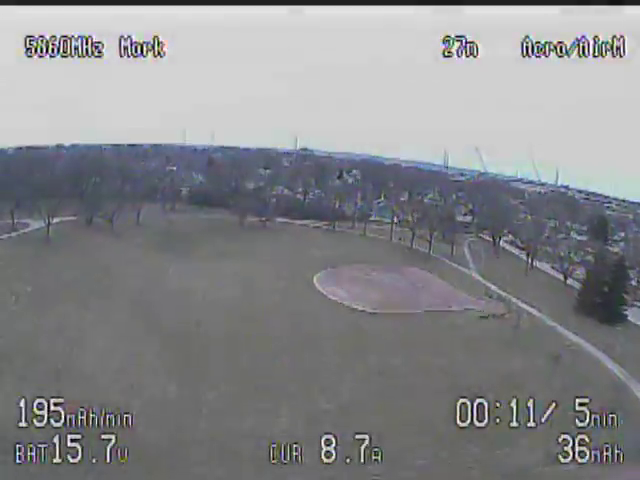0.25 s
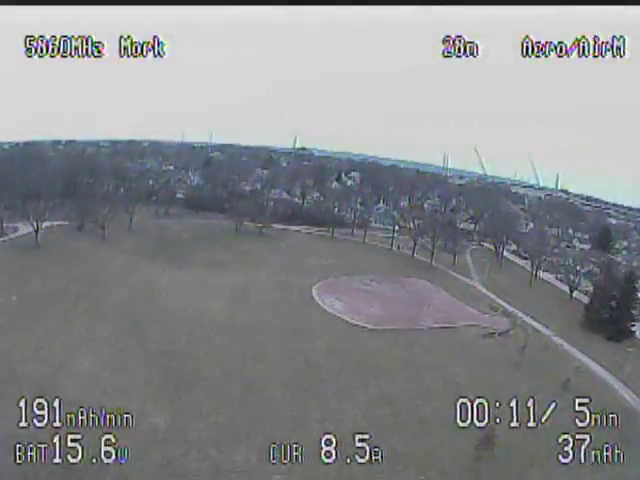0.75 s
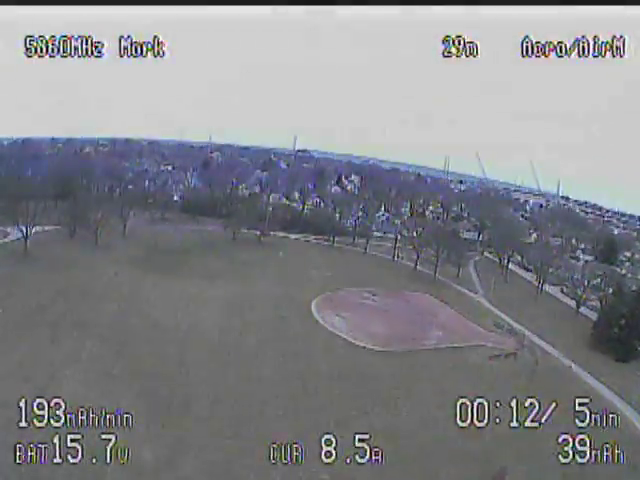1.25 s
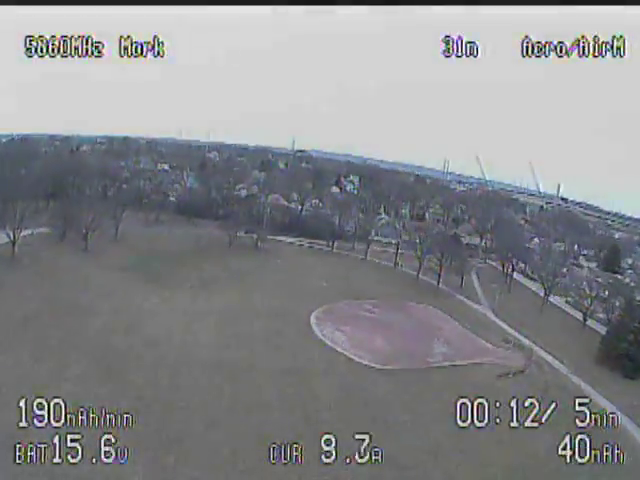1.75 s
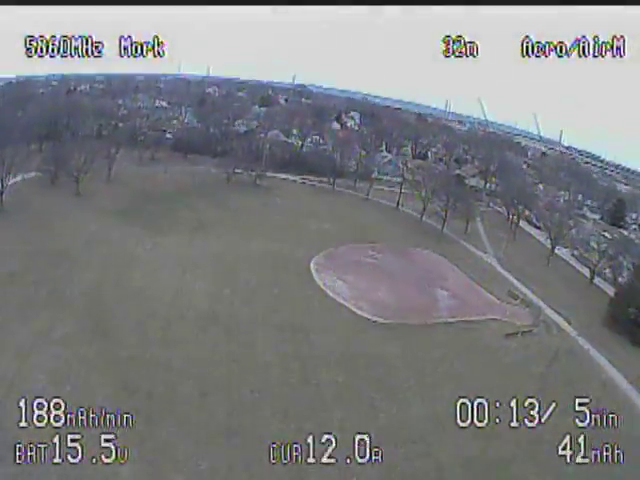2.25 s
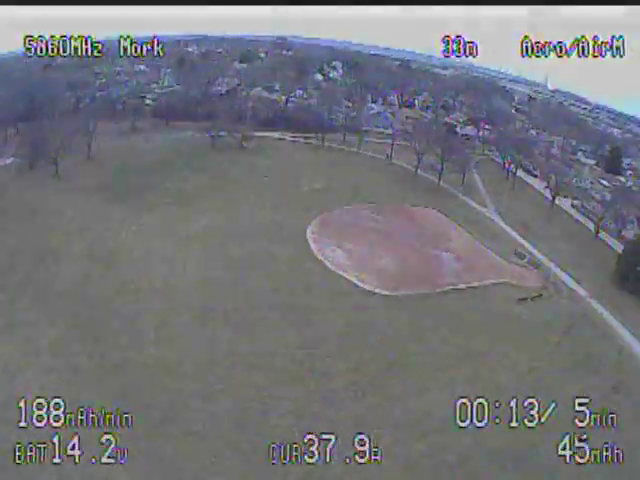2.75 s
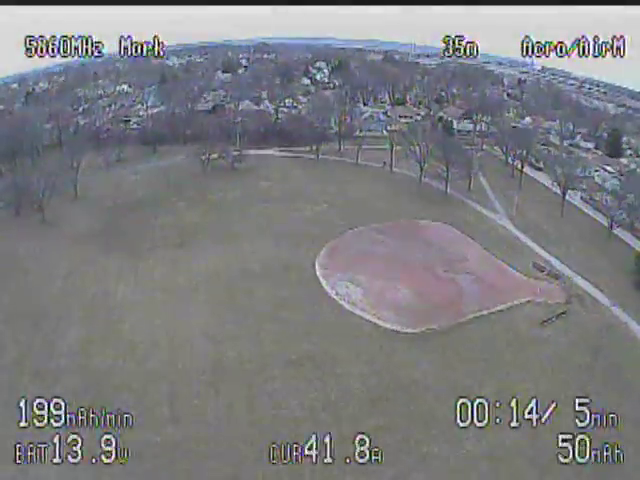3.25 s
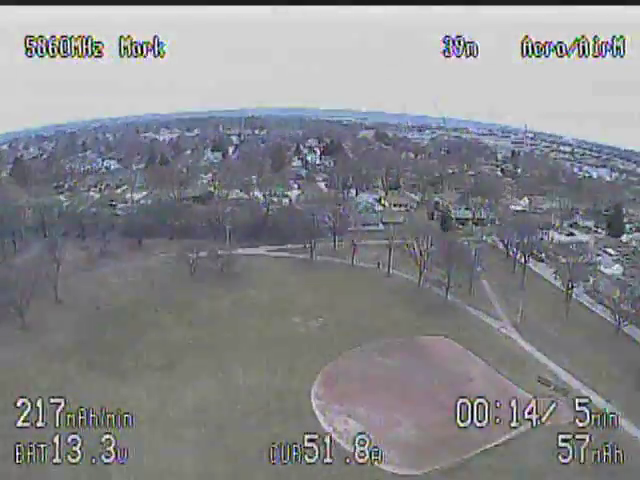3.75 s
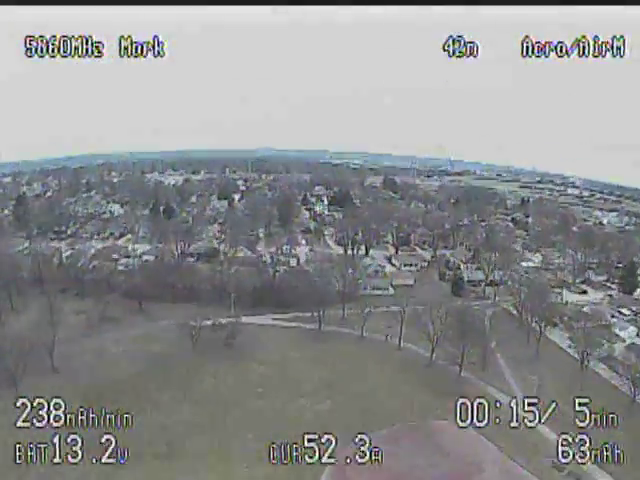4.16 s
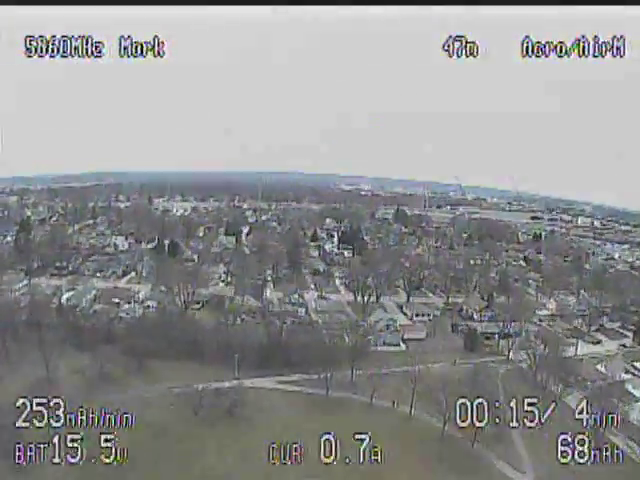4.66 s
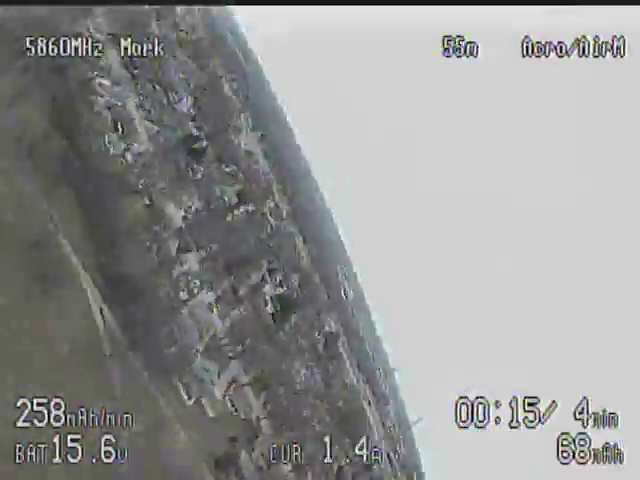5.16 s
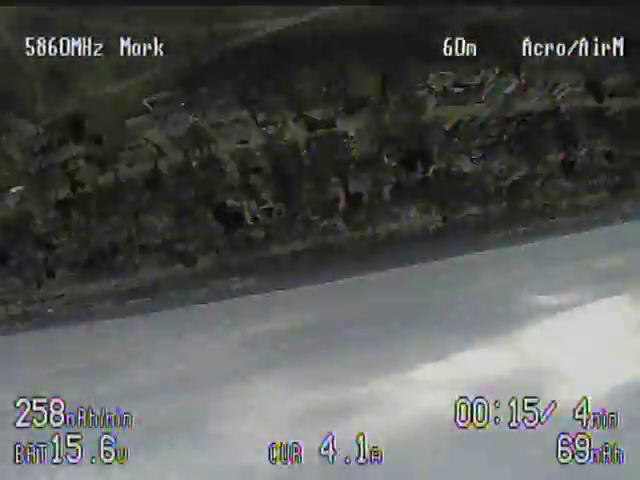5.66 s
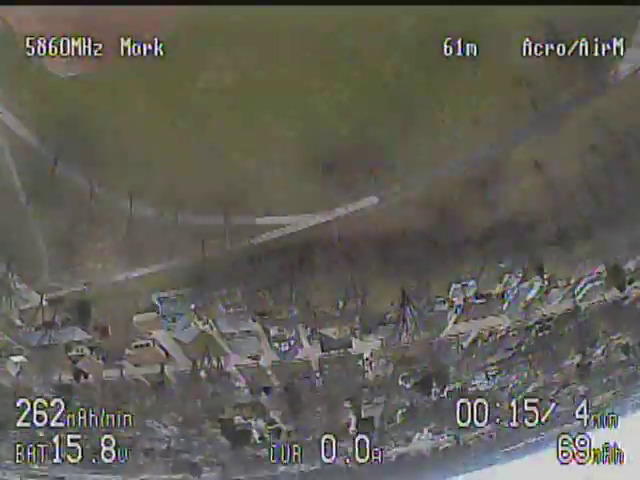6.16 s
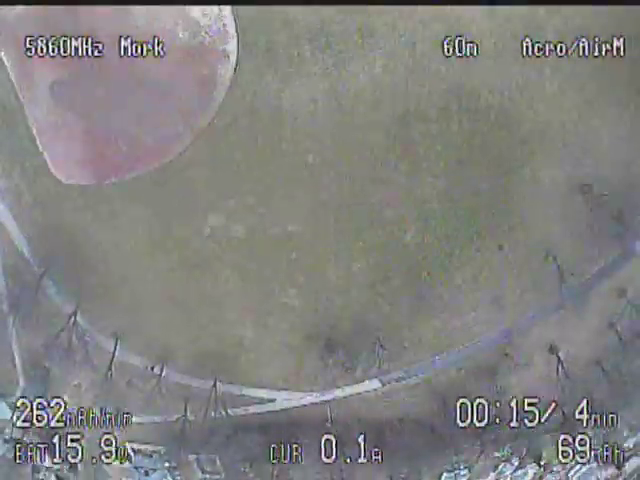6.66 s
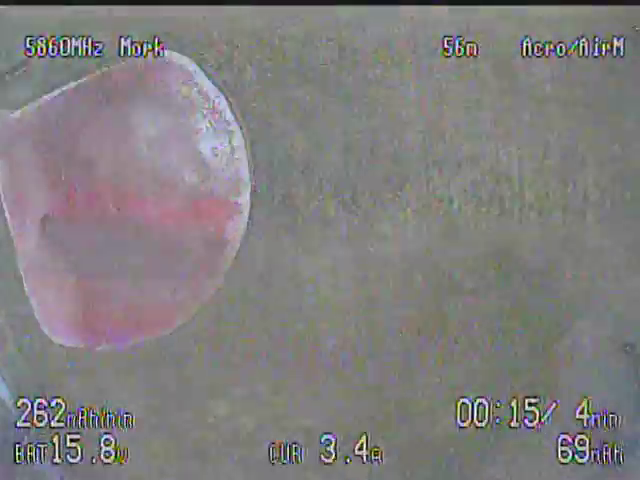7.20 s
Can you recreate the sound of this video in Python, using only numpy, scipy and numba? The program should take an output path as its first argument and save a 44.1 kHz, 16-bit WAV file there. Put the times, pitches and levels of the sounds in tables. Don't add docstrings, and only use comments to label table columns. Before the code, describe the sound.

Heard from a microphone on a small racing drone over a park: a steady, harsh propeller buzz, clipped and narrow in tone. It steps up in pitch and becomes rougher as the craft climbs. Then power is cut, the buzz drops away, and heavy wind thumps the microphone while slowed propellers flutter low, with one short rev and a weaker push as it rolls over.

```python
import sys
import numpy as np
from scipy import signal
from scipy.fft import rfft, irfft, next_fast_len
from scipy.io import wavfile
from numba import njit

SR = 44100
rng = np.random.default_rng(int(sys.argv[2]) if len(sys.argv) > 2 else 0)


def rack_gain(trim_db):
    fader = np.asarray(trim_db, float)
    return 10 ** (fader / 20)


def store_wav(level_fs):
    pcm = np.round(np.clip(np.atleast_2d(level_fs), -1, 1) * 32767)
    wavfile.write(sys.argv[1], SR, pcm.T.astype(np.int16))


N = 327663
T = np.arange(N) / SR


def evened(x):
    return x / np.sqrt(np.mean(x ** 2) + 1e-20)


def along(rows):
    s, *columns = np.transpose(rows)
    return [np.interp(T, s, column) for column in columns]


def noise(points):
    size = next_fast_len(N)
    hz = np.fft.rfftfreq(size, 1 / SR)
    f, db = np.transpose(points)
    shape = rack_gain(np.interp(np.log(hz + 1), np.log(f), db)) * (hz < 6000)
    white = rfft(rng.standard_normal(size))
    return evened(irfft(white * shape, size)[:N])


def drift(hz):
    return noise([(hz / 40, -40), (hz / 8, 0), (hz, -3.5), (hz * 4, -40), (hz * 8, -90)])


# time in seconds, blade passages per second.
THROTTLE = [(0, 417), (.9, 410), (1.9, 415), (2.16, 426), (2.25, 458), (2.47, 466), (2.55, 585),
            (2.74, 651), (3.27, 655), (3.34, 715), (4.585, 712), (4.66, 610), (4.76, 200), (5.25, 165),
            (5.38, 117), (5.74, 99), (5.88, 120), (6.5, 110)]
# start in seconds, extra blade passages per second,
# rise in seconds, fall in seconds.
BLIPS = [
    (5.75, 160, .05, .033),
    (6.08, 12, .15, .12),
    (6.72, 45, .08, .5),
]


def rotor_speed():
    lag_s = 0.05
    asked = along(THROTTLE)[0]
    for s, extra, rise, fall in BLIPS:
        attack = np.clip((T - s) / rise, 0, 1)
        decay = np.exp(-np.maximum(T - s - rise, 0) / fall)
        asked = asked + extra * attack * decay
    r = np.exp(-1 / (lag_s * SR))
    return asked[0] + signal.lfilter([1 - r], [1, -r], asked - asked[0])


def by_flight(hovering, climbing, coasting):
    hover_rate, climb_rate = 422, 660
    cut_s, cut_length_s = 4.7, 0.04
    fastest = np.maximum.accumulate(rotor_speed())
    climb = np.clip((fastest - hover_rate) / (climb_rate - hover_rate), 0, 1)
    climb = climb ** 0.7
    cut = np.clip((T - cut_s) / cut_length_s, 0, 1)
    powered = hovering + climb * (climbing - hovering)
    return (1 - cut) * powered + cut * coasting


# time in seconds, blade beat in dB, buffeting in dB,
# steady wash pressure in capsule units, share of fine eddies from 0 to 1.
COASTING = [
    (4.74, 8.5, 11.5, 3, .4),
    (4.87, 10, 11, 2.1, .05),
    (5.15, -2, 12, 2.8, 1),
    (5.42, 13, 10.5, 1.9, .05),
    (5.84, 18, 4.5, 3.2, .05),
    (6.42, 13.5, 8, 1.7, 0.3),
    (6.56, 9, 11.5, 3.2, 0.2),
    (6.9, 7.5, 11.5, 3, .5),
    (7.43, 8.5, 13, 2.5, .9),
]


def airflow():
    unload_s, unload_db_per_s = 4.62, -65
    tilt_s, tilt_length_s, tilt_db = 2.4, 0.2, 6.5
    hovering = (18.95, 3, 7.17, 0.024, 0.016)
    climbing_db = 15.2 + unload_db_per_s * np.maximum(T - unload_s, 0)
    climbing = (climbing_db, 6.7, 7.07, 0.099, 0.16)
    coasting = along(COASTING) + [0.13]
    states = zip(hovering, climbing, coasting)
    blade_db, buffet_db, wash, fine, imbalance = (by_flight(*values) for values in states)
    buffet_db = buffet_db + tilt_db * np.exp(-((T - tilt_s) / tilt_length_s) ** 2)
    return blade_db, buffet_db, wash, fine, imbalance


def neighbour_rotor(speed):
    slip = 0.014
    turns = np.cumsum(speed * (1 + slip * (2 + drift(4.17)))) / SR
    return rack_gain(by_flight(-30, -26, -29.5)) * np.cos(2 * np.pi * turns)


# multiple of the blade rate, level in dB, phase in radians.
BLADE = [(1, -1.5, 0.5), (2, -9.5, 3.5), (3, -14, 1), (4, -18, 3), (5, -25.5, -0.5), (6, -29, 2)]


def propeller(level_db, imbalance):
    speed = rotor_speed()
    bite_db = by_flight(-5, -0.5, -6.5)
    waver = by_flight(0.0025, 0.008, 0.006)
    flutter_db = by_flight(0.5, 1.33, 0.5)
    jitter_turns = 0.002
    turns = np.cumsum(speed * (1 + waver * drift(16))) / SR + jitter_turns * drift(120)
    beat = np.zeros(N)
    for k, db, phase in BLADE:
        overtone_db = db + (k > 1.5) * bite_db
        beat += rack_gain(overtone_db) * np.cos(2 * np.pi * k * turns + phase)
    full_rate, wobble_power, wobble_swing_db = 636, 6.1, 2
    wobble = imbalance * (1 + (speed / full_rate) ** wobble_power)
    wobble = wobble * rack_gain(wobble_swing_db * drift(9.4))
    shaft = wobble * np.cos(np.pi * turns + 0.6)
    return rack_gain(level_db + flutter_db * drift(30)) * (beat + shaft + neighbour_rotor(speed))


# frequency in Hz, density in dB.
COARSE = [(10, 7.5), (30, -4.5), (100, 4), (200, 7), (400, 3.5), (800, -28), (1600, -43), (4000, -48)]
FINE = [(10, -25.5), (60, -8.5), (200, -2.5), (500, -8), (1000, -9), (1600, -25.5), (2500, -37.5),
        (4000, -43)]


def buffeting(level_db, fine):
    fine = np.clip(fine, 0, 1)
    coarse_eddies = np.sqrt(1 - fine) * noise(COARSE)
    fine_eddies = np.sqrt(fine) * noise(FINE) * rack_gain(3.6 * drift(16))
    return rack_gain(level_db + 1.5 * drift(9)) * (coarse_eddies + fine_eddies)


# frequency in Hz, density in dB.
SWELL = [(6, -22), (20, -10), (45, -12), (100, -15), (250, -36.5)]


def heaving():
    return rack_gain(by_flight(1, 4.5, 1.5)) * noise(SWELL)


# frequency in Hz, density in dB.
SHUDDER = [(8, -6.5), (22, -2.5), (50, -17), (120, -17.5), (300, -30)]


def shudder():
    return rack_gain(by_flight(-20, -15, -21.5)) * noise(SHUDDER)


# centre in seconds, length in seconds,
# pressure in capsule units (negative is suction).
GUSTS = [(4.793, .006, 14), (4.817, .006, 14), (4.916, .012, 18), (4.998, .021, 20.5), (5.043, .011, -20.5),
         (5.11, .006, 14), (5.221, .015, 18), (5.34, .007, 12), (6.49, .006, 11), (6.642, .008, 12),
         (6.96, .006, 14), (6.982, .008, 11)]


def gusts():
    return sum(push * np.exp(-(2 * (T - s) / length) ** 4) for s, length, push in GUSTS)


def scene():
    blade_db, buffet_db, wash, fine, imbalance = airflow()
    rotor = propeller(blade_db, imbalance)
    pressure = wash + heaving() + rotor + buffeting(buffet_db, fine) + gusts()
    return pressure[None]


def capsule(p):
    leak, depth = 0.012, 2.15
    dips = depth * (np.tanh(p / 2) - 1) / 2
    return dips + leak * 7.65 * np.tanh(p / 8.6)


@njit
def follow(x, share, most):
    out, y = np.empty_like(x), x[0]
    for i in range(len(x)):
        y += max(share * (x[i] - y), -most)
        out[i] = y
    return out


def link(x):
    rise_hz, fall_per_s, treble_hz = 960, 2293, 2800
    coupling_hz, damping, offset = 23, 1.104, 0.0017
    x = follow(x, 1 - np.exp(-2 * np.pi * rise_hz / SR), fall_per_s / SR)
    x = signal.lfilter(*signal.butter(1, treble_hz, fs=SR), x - x.mean())
    w = 2 * np.pi * coupling_hz
    highpass = signal.bilinear([1, 0, 0], [1, damping * w, w ** 2], SR)
    return signal.lfilter(*highpass, x) + offset


def top_cut(x):
    return signal.sosfilt(signal.butter(12, 15950, fs=SR, output="sos"), x)


def record(dry):
    link_rate, up, down = 8000, 441, 80
    full = np.sqrt(0.5)
    hiss = rack_gain(-51) * noise([(100, 0), (4000, -3)])
    heard = link(capsule(dry[0]) + shudder()) + hiss
    sampled = np.clip(signal.resample_poly(heard, down, up), -full, full)
    taps = signal.firwin(32 * up + 1, link_rate / 2, window=("kaiser", 9), fs=link_rate * up)
    smooth = signal.resample_poly(sampled, up, down, window=taps)
    smooth = np.pad(smooth, (0, up))[:N]
    mix = np.clip(smooth, -full, full)[None]
    return top_cut(mix)


dry = scene()
out = record(dry)
store_wav(out)
```